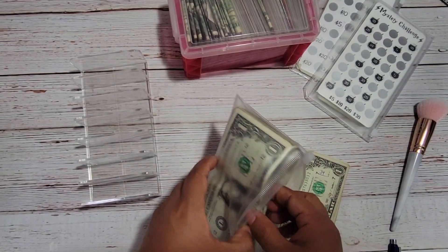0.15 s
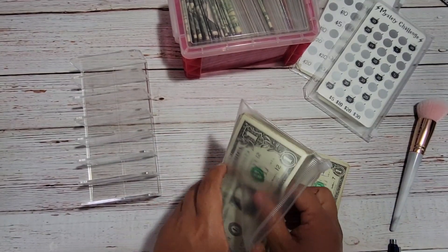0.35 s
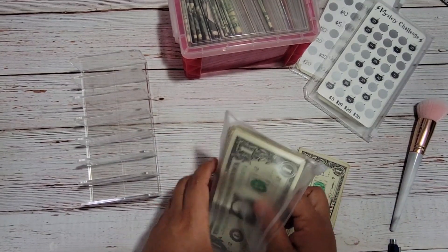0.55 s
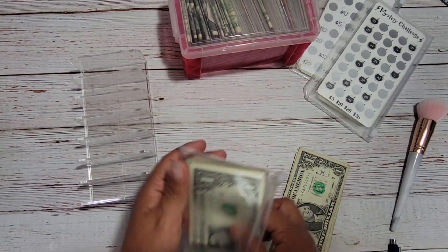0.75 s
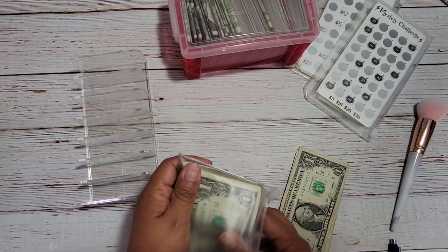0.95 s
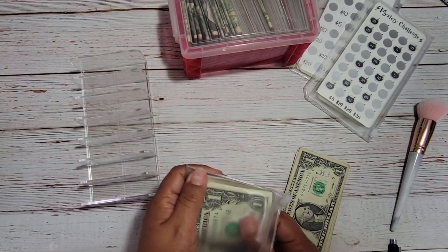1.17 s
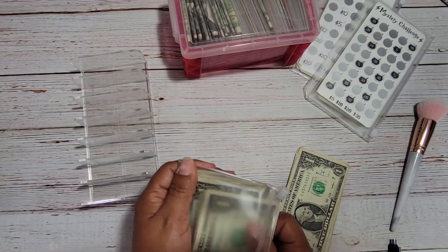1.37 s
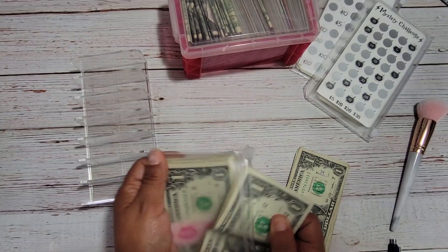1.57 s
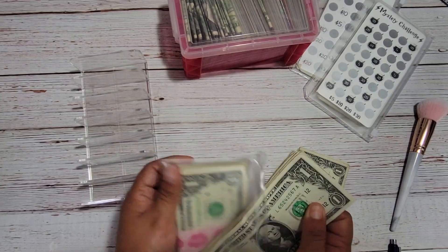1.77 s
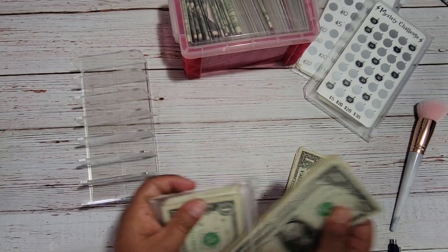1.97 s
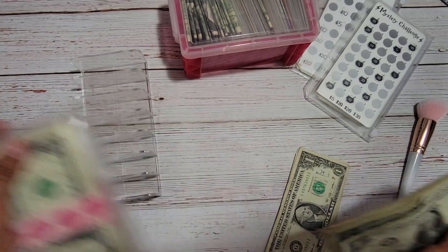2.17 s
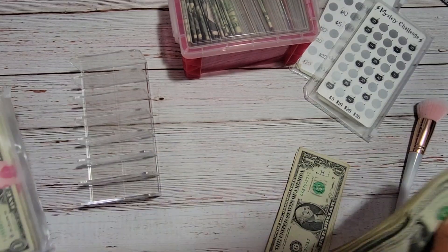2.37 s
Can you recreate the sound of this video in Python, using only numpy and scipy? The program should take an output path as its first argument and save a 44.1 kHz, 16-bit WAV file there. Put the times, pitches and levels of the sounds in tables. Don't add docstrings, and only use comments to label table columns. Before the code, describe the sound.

Close, dry rustling and crisp flicks of paper money, with a deep drone in the room

```python
import sys
import numpy as np
from scipy import signal
from scipy.fft import rfft, irfft
from scipy.io import wavfile
from scipy.ndimage import uniform_filter1d

SR = 44100
rng = np.random.default_rng(int(sys.argv[2]) if len(sys.argv) > 2 else 0)


def master_out(mix):
    frames = np.transpose(np.atleast_2d(mix))
    ceiling = np.clip(frames, -1, 1)
    pcm = np.round(ceiling * 32767).astype(np.int16)
    wavfile.write(sys.argv[1], SR, pcm)


def volts_from_db(level):
    exponent = np.asarray(level, float) / 20
    return 10 ** exponent


N = 106810
BASS_LEFT_DB = -4


def level(x, db):
    return x * volts_from_db(db) / np.sqrt(np.mean(x ** 2))


def colour(x, db_of_hz):
    hz = np.maximum(np.arange(N // 2 + 1) * SR / N, 1)
    return irfft(rfft(x) * volts_from_db(db_of_hz(hz)), N)


def curve(table):
    points_hz, points_db = np.array(table).T
    return lambda hz: np.interp(np.log(hz), np.log(points_hz), points_db)


def bumps(table, hz):
    return sum(db * np.exp(-((hz - centre) / width) ** 2) for centre, width, db in table)


def walk(rate_hz):
    k = int(SR / rate_hz)
    held = np.repeat(rng.standard_normal(N // k + 1), k)
    return 1.53 * uniform_filter1d(uniform_filter1d(held, k), k)[:N]


def ring(x, hz, width_hz):
    return signal.lfilter(*signal.iirpeak(hz, hz / width_hz, fs=SR), x)


def late(x, ms):
    return np.interp(np.arange(N) - ms * SR / 1000, np.arange(N), x)


def add(out, s, x):
    i = int(s * SR)
    out[i:i + len(x)] += x[:N - i]


# (frequency [Hz], density [dB per Hz])
AIR_SPECTRUM = [(25, -12), (40, -4.5), (90, 0), (160, -13), (500, -16.5), (900, -26), (6500, -38.5),
                (9500, -56)]
AIR_DB, AIR_ALIKE_HZ, HISS_DB = -49.5, 450, -70


def air():
    mid, side = colour(rng.standard_normal((2, N)), curve(AIR_SPECTRUM))
    side = colour(side, lambda hz: -10 * np.log10(1 + (AIR_ALIKE_HZ / hz) ** 2))
    ports = np.array([mid + side, mid - side])
    tilt = np.array([[1], [-1]]) * BASS_LEFT_DB / 2
    ports = colour(ports, lambda hz: tilt / (1 + (hz / 400) ** 2))
    return level(ports, AIR_DB) + volts_from_db(HISS_DB) * rng.standard_normal((2, N))


def whine():
    return level(ring(rng.standard_normal((2, N)), 6360, 190), -74)


# (time [s], frequency [Hz], level [dB])
DRONE_PATH = [
    (0, 67.8, -42),
    (.25, 66.9, -44),
    (.92, 66.68, -39.5),
    (1.08, 65.34, -34.5),
    (1.5, 64.95, -34),
    (2.42, 64.85, -36),
]
MAINS_HZ, MAINS_DB, MAINS_WOBBLE_DB, DRONE_WOBBLE_DB = 121.5, -49, 1.5, 0.5
HUM_LAG_MS = 0.65


def hum(t):
    s, hz, db = np.array(DRONE_PATH).T
    drone_db = np.interp(t, s, db)
    phase = 2 * np.pi * np.cumsum(np.interp(t, s, hz)) / SR + 0.064 * walk(30.0)
    drone = volts_from_db(drone_db + DRONE_WOBBLE_DB * walk(32.52)) * np.sin(phase)
    mains_phase = 2 * np.pi * MAINS_HZ * t + 0.53 * walk(26)
    mains = volts_from_db(MAINS_DB + MAINS_WOBBLE_DB * walk(18.46)) * np.sin(mains_phase)
    flutter = ring(ring(rng.standard_normal(N), 33.0, 25), 49, 25) * volts_from_db(drone_db + 13.0)
    casing = ring(rng.standard_normal(N), 231.4, 16.7) * volts_from_db(-34.5)
    drone = np.sqrt(2) * (drone + mains) + casing + flutter
    port_gain = volts_from_db(np.array([[.5], [-.5]]) * BASS_LEFT_DB)
    return np.array([drone, late(drone, HUM_LAG_MS)]) * port_gain


# (time [s], level [dB], frequency [Hz], t60 [ms])
STACK_THUMPS = [(.578, -27.5, 497, 22.5), (.8228, -29, 485, 15), (.8485, -20, 513, 19),
                (.85, -40.5, 174, 160), (.862, -40, 343, 45), (.997, -37, 490, 29), (1.04, -21, 422, 13),
                (1.0988, -30, 478, 27), (1.242, -30, 562, 16), (1.307, -34, 500, 22),
                (1.46, -46.5, 287, 96), (1.968, -43, 387, 49.6)]
THUMP_LAG_MS = 0.13


def thumps():
    out, t = np.zeros(N), np.arange(4096) / SR
    for s, db, hz, t60_ms in STACK_THUMPS:
        mode = np.sin(2 * np.pi * hz * t) + 0.46 * np.sin(2 * np.pi * hz * 1.28 * t)
        decay = np.exp(-np.log(1000) * t * 1000 / t60_ms)
        soft_onset = 1 - np.exp(-t * hz * 1.5)
        add(out, s, -volts_from_db(db + 0.5) * mode * decay * soft_onset)
    return np.array([out, late(out, THUMP_LAG_MS)])


# (time [s], level [dB], ring [Hz],
# burst [ms], wide crack [dB])
PAPER_SNAPS = [(0.348, -34.5, 1100, 6.1, -11), (0.3601, -25.5, 2600, 2.7, -22),
               (0.3602, -28, 1265, 1.26, -26), (0.4107, -35.5, 2600, 1.1, 0),
               (0.4632, -26, 8800, 2.5, -21), (0.5324, -45, 4470, 5.1, 11), (.569, -21, 2850, 0.96, -14),
               (.586, -24.5, 2880, 3.2, -17), (.678, -37.5, 2920, 2.7, -12), (0.8223, -30, 1250, 1.7, -2),
               (0.8474, -27.5, 3630, 1.5, -4), (0.952, -42.5, 1190, 8.3, -11),
               (1.0864, -34.5, 4100, 1, 8.5), (1.098, -30.5, 4530, 2.1, 6.5),
               (1.243, -46.5, 3100, 2.6, 14.5), (1.4, -42.5, 1230, 4.1, -15), (1.704, -35, 1160, 6.9, -2),
               (1.7140, -34, 2160, 5.2, -24), (1.913, -38, 2050, 5.8, -21), (1.956, -27, 3420, 3.2, -12),
               (2.2436, -37.5, 3800, 3, -0.5),
               (.3745, -40, 7400, 2, -10), (.5500, -37, 1360, 6.8, -20), (0.5769, -25, 1380, 5.3, -9),
                  (0.5768, -18, 8200, 3.8, -12), (0.8183, -36.5, 2170, 3, -9),
                  (1.0971, -35, 1100, 2.1, -20), (1.762, -39.5, 1610, 2.1, -13), (1.839, -40, 1898, 1.7, 1),
                  (1.958, -29, 2070, 3.5, 0), (1.956, -26.5, 5070, 4.1, -6), (2.244, -45, 1229, 1.3, -11),
                  (2.3700, -52, 13000, 5.6, 6),
               (0.3607, -32.5, 4370, 1.4, -23), (.3615, -37.5, 6800, 1.7, -25), (.525, -44, 7000, 1.1, 5),
               (0.547, -28, 8050, 2, -13), (.552, -26, 7900, 3.2, -12), (0.5668, -21, 8400, 2.1, -7),
               (0.8491, -33, 1100, 3.8, -16), (0.851, -34, 5900, 1.5, -11), (0.86, -47, 1310, 3, -5),
               (1.306, -45, 1000, 2.5, -10), (1.752, -39, 1320, 1.1, -10), (1.825, -41, 1044, 2, -7),
               (1.8423, -44, 3970, 0.74, 14.5), (1.872, -42, 2170, 2.5, -15), (2.362, -56, 3000, 1.3, -2),
               (2.166, -46.5, 3400, 2.2, -1), (1.0395, -41, 1160, 2.6, -21), (1.086, -37, 7940, 1, -10),
               (1.0975, -28, 8200, 2.4, 0.5), (1.0975, -37, 12900, 2.5, -18), (1.242, -46, 1040, 2, -15),
               (.5785, -23, 1840, 4, -20)]
SEAL_TEARS = [
    (.5752, -16, 2900, .35, -9),
    (.5770, -13.5, 2800, .35, -8),
    (.5793, -17, 2750, .8, -11),
    (.5815, -18, 2900, 1.6, -12),
]
SNAP_WIDTH, TEAR_WIDTH = 0.18, 0.43


def snap_group(out, events, width):
    t = np.arange(2048) / SR
    for s, db, hz, burst_ms, crack_db in events:
        spatter = rng.standard_normal(2048) * volts_from_db(2.6 * rng.exponential(size=2048))
        burst = spatter * np.exp(-t * 1000 / burst_ms)
        burst[1] += 6.0
        tone = ring(ring(burst, hz, hz * width), hz, hz * 0.71)
        crack = ring(ring(burst, 5000, 8000), 4000, 7000)
        tone = tone / np.abs(tone).max()
        crack = crack / np.abs(crack).max()
        add(out, s, volts_from_db(db) * (tone + volts_from_db(crack_db) * crack))


def snaps():
    out = np.zeros(N)
    snap_group(out, PAPER_SNAPS, SNAP_WIDTH)
    snap_group(out, SEAL_TEARS, TEAR_WIDTH)
    return out


# (start [s], end [s], frequency [Hz], level [dB])
EDGE_SINGS = [(.363, 0.372, 2730, -49), (.415, 0.459, 1180, -52), (0.46, 0.47, 6800, -56),
              (0.549, 0.59, 3120, -37.5), (0.584, 0.605, 3230, -52), (0.649, 0.708, 1060, -51),
              (1.401, 1.46, 1400, -54), (1.418, 1.451, 2190, -46), (1.42, 1.446, 2870, -52),
              (1.461, 1.518, 1100, -50), (1.471, 1.527, 2950, -49), (1.488, 1.516, 4300, -52),
              (1.549, 1.615, 1390, -48.5), (1.585, 1.625, 1570, -62), (1.595, 1.633, 3000, -59),
              (1.651, 1.684, 4950, -56), (1.781, 1.814, 2020, -51), (1.785, 1.8, 3260, -62),
              (1.847, 1.885, 1150, -53), (1.867, 1.91, 2100, -55.5), (1.917, 1.95, 6200, -46),
              (1.945, 1.965, 6600, -45), (1.959, 1.976, 2120, -44), (.2, 0.262, 1480, -52.5),
              (0.474, 0.56, 1090, -57), (1.906, 1.926, 2080, -45.5)]
SING_WIDTH = 0.11


def sings():
    out = np.zeros((2, N))
    for start, end, hz, db in EDGE_SINGS:
        drag = rng.standard_normal((2, 4096)) * volts_from_db(2.3 * rng.exponential(size=4096))
        ports = np.array([drag[0], 1.4 * drag[0] + 0.27 * drag[1]])
        tone = ring(ring(ports, hz, hz * SING_WIDTH), hz, hz * 0.34)
        swell = np.sin(np.pi * np.clip(np.arange(4096) / SR / (end - start), 0, 1))
        for port in range(2):
            add(out[port], start, level(tone[port], db) * swell)
    return out


GRAIN_DB, FLUTTER_DB, FLUTTER_HZ = 2.5, 1.32, 90.4
BAND_DB, BAND_HZ, SMOOTH_ABOVE_HZ = 3, 30, 3000


def sheet(grain):
    out = np.zeros(N)
    for hz, gain in grain[1]:
        out += ring(rng.standard_normal(N) * grain[0], hz, hz / 18) * gain
    return level(out, 0)


def port_pair(both, apart, alike):
    return np.array([both, alike * both + np.sqrt(1 - alike ** 2) * apart])


# (start [s], peak [s], end [s], level [dB], brightness [dB])
SHEET_SLIDES = [(.0, 0.025, 0.091, -60, -32), (0.159, 0.235, 0.34, -50, -6),
                (0.342, 0.35, 0.46, -52.5, -5.5), (0.4, 0.411, 0.59, -51.5, -8),
                (0.458, 0.468, 0.6, -73, 9), (0.542, 0.549, 0.63, -46.5, 9.5),
                (0.547, 0.567, 0.74, -51.5, -30), (0.626, 0.697, 0.8, -49.5, 6.5),
                (0.743, 0.81, 0.8, -50, -3), (0.786, 0.852, 0.913, -45, -7),
                (0.83, 0.951, 1.116, -53.5, -2.5), (1.08, 1.087, 1.182, -49.5, -5),
                (1.159, 1.24, 1.413, -49, -12), (1.376, 1.444, 1.68, -45, -15.5),
                (1.417, 1.554, 1.58, -53.5, 3), (1.436, 1.601, 1.76, -46.5, 3.5),
                (1.628, 1.734, 1.743, -51.5, 3), (1.69, 1.803, 1.886, -47, -4),
                (1.85, 1.953, 2.06, -42.5, 3), (1.95, 1.958, 2.06, -54, 10.5),
                (2.087, 2.18, 2.34, -59.5, -12), (2.233, 2.245, 2.29, -61, 6.5),
                (2.366, 2.362, 2.39, -87.5, 17), (2.413, 2.43, 2.44, -59, -3)]
# (frequency [Hz], gain [dB])
DULL_COLOUR = [(200, -42), (500, -8.5), (900, -1.5), (1200, -3.5), (3000, -0.5), (5000, -7.5),
               (8000, -18.5), (15000, -30)]
# (frequency [Hz], gain [dB])
RASP_COLOUR = [(200, -89), (2000, -67.5), (4500, -13), (7500, -4.5), (9000, -7), (12500, -12), (16000, -29)]
# (frequency [Hz], gain [dB])
FIZZ_COLOUR = [(5000, -75), (9000, -32.5), (11000, -33.5), (13000, -23.5), (16000, -33)]
# (frequency [Hz], width [Hz], gain [dB])
STACK_MODES = [(1100, 190, 3), (1380, 90, 2), (2070, 67, 0), (2800, 180, 1), (840, 59, -7.5),
               (2600, 160, -5)]
FIZZ_SLOPE = 3.43
RASP_ALIKE, BODY_ALIKE = 0.3, 0.79


def rub(t):
    dull, rasp, fizz = np.zeros((3, N))
    for start, peak, end, db, bright_db in SHEET_SLIDES:
        stroke = np.interp(t, [start, peak, end], [0, 1, 0])
        power = volts_from_db(2 * db) * np.sin(np.pi / 2 * stroke) ** 4.09
        dull += power
        rasp += power * volts_from_db(2 * bright_db)
        fizz += power * volts_from_db(2 * FIZZ_SLOPE * bright_db)
    clicks = volts_from_db(GRAIN_DB * rng.exponential(size=N) + FLUTTER_DB * walk(FLUTTER_HZ))
    modes = []
    for hz in 250 * 2 ** np.arange(0, 6, 1 / 7):
        wander_db = BAND_DB * min(1, SMOOTH_ABOVE_HZ / hz)
        modes.append((hz, volts_from_db(wander_db * walk(BAND_HZ))))
    both, apart = sheet((clicks, modes)), sheet((clicks, modes))
    pair = port_pair(both, apart, RASP_ALIKE)
    body = port_pair(both, apart, BODY_ALIKE)
    body = colour(body, lambda hz: curve(DULL_COLOUR)(hz) + bumps(STACK_MODES, hz))
    out = np.sqrt(dull) * body
    out += np.sqrt(rasp) * colour(pair, curve(RASP_COLOUR))
    out += np.sqrt(fizz) * colour(pair, curve(FIZZ_COLOUR))
    return out / np.std(body)


PORT_RAD, PORT_HZ = 1, 820
LEFT_DB, LEFT_TREBLE_DB = -1.5, -10.5


def at_ports(paper):
    left, right = paper
    left = colour(left, lambda hz: LEFT_DB / 2 + LEFT_TREBLE_DB / (1 + (9000 / hz) ** 4))
    hz = np.arange(N // 2 + 1) * SR / N
    lag = np.exp(-1j * PORT_RAD * hz ** 2 / (hz ** 2 + PORT_HZ ** 2))
    right = irfft(rfft(right) * lag, N) * volts_from_db(-LEFT_DB / 2)
    return np.array([left, right])


ROOM_T60_S, ROOM_DB = 0.16, -8


def room(paper, t):
    age = t[:SR // 2]
    decay = np.exp(-np.log(1000) * age / ROOM_T60_S)
    tail = rng.standard_normal((2, len(age))) * decay * np.clip(age / 0.004, 0, 1)
    tail = tail / np.sqrt(np.sum(tail ** 2, axis=1, keepdims=True))
    tail = signal.lfilter([.5], [1, -.45], tail)
    return volts_from_db(ROOM_DB) * signal.fftconvolve(paper, tail, axes=1)[:, :N]


def scene():
    t = np.arange(N) / SR
    paper = rub(t) + snaps() + sings() + thumps()
    return at_ports(paper) + room(paper, t) + hum(t) + air() + whine()


def top_cut(x):
    return signal.sosfilt(signal.butter(12, 15960, fs=SR, output="sos"), x)


# (frequency [Hz], width [Hz], gain [dB])
MIC_PEAKS = [(7490, 1360, 1.5), (9960, 1530, -9), (13200, 2000, -4)]
TOP_HZ = 15850


def record(dry):
    x = colour(dry, lambda hz: bumps(MIC_PEAKS, hz) - 30 * (hz > TOP_HZ))
    return top_cut(x)


dry = scene()
out = record(dry)
master_out(out)
```